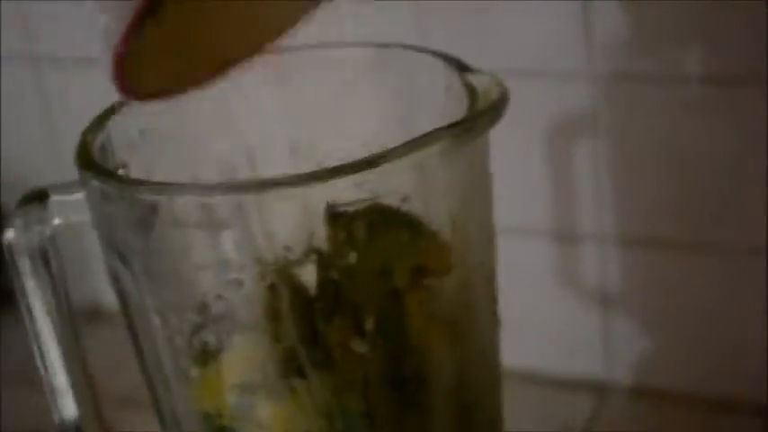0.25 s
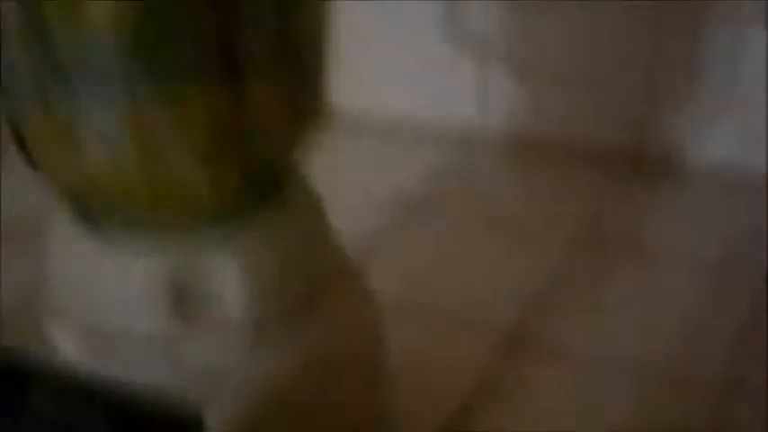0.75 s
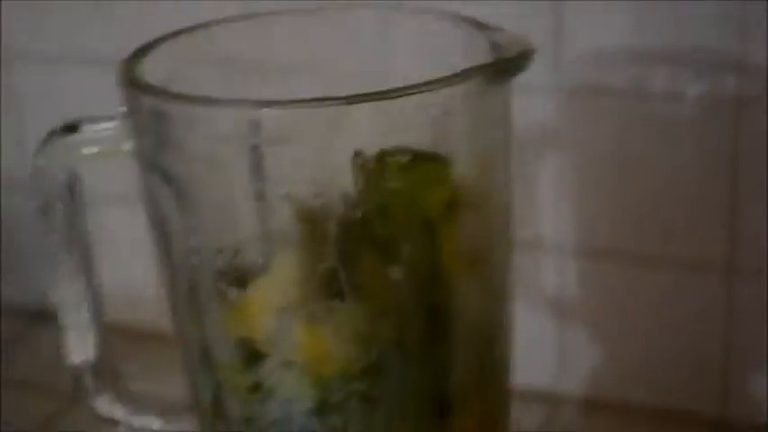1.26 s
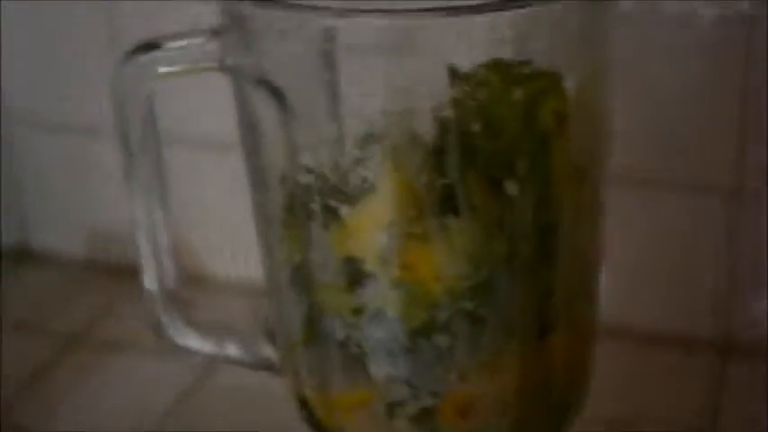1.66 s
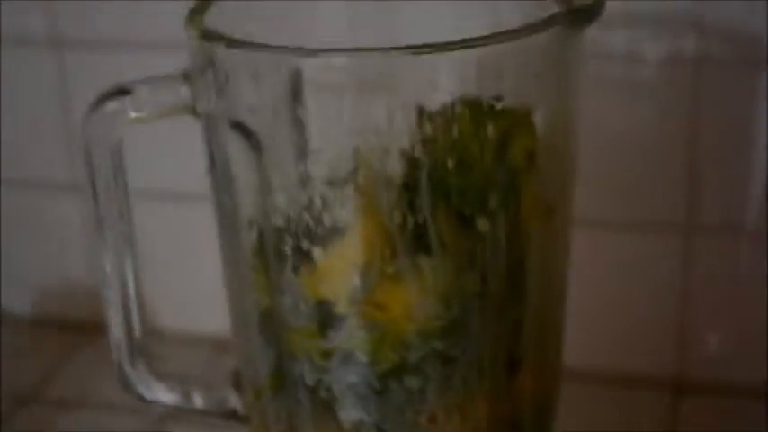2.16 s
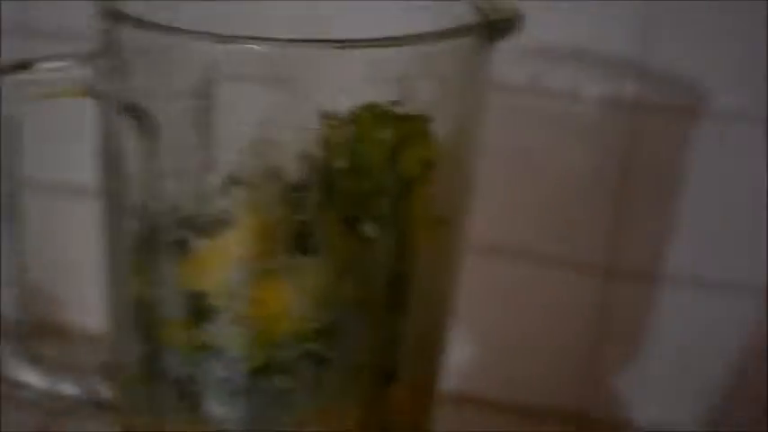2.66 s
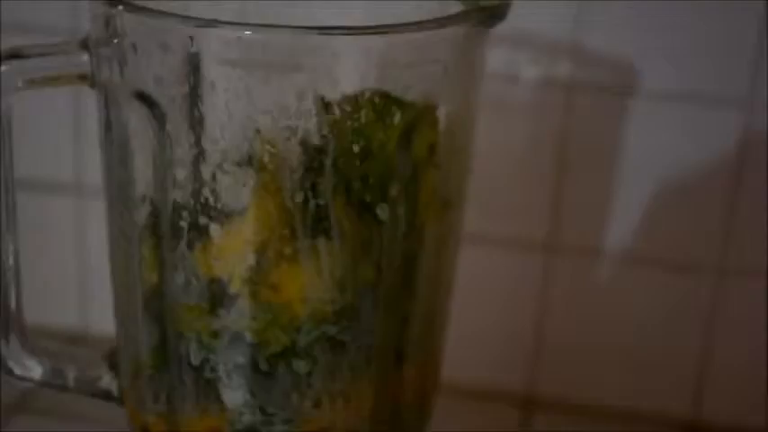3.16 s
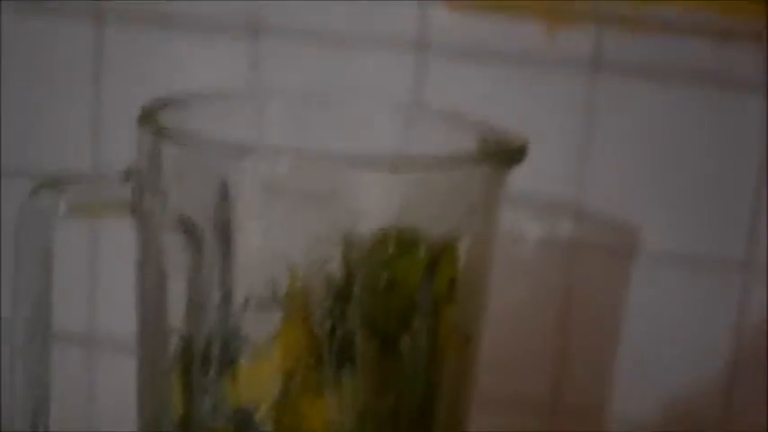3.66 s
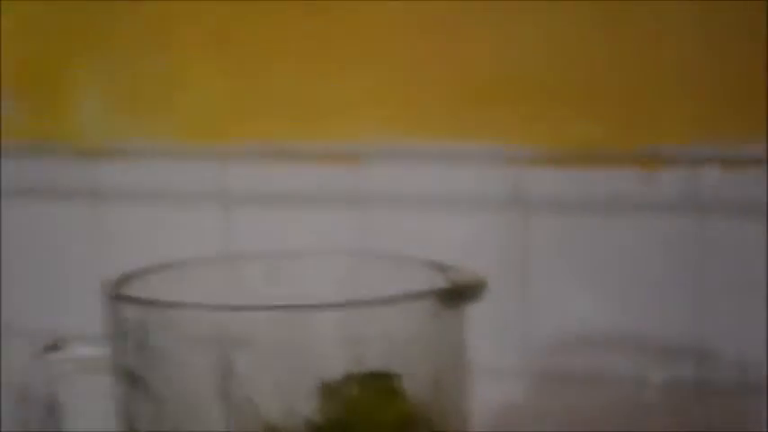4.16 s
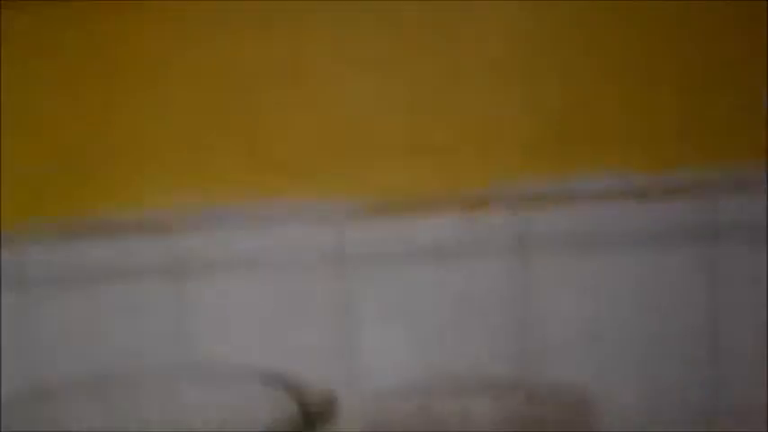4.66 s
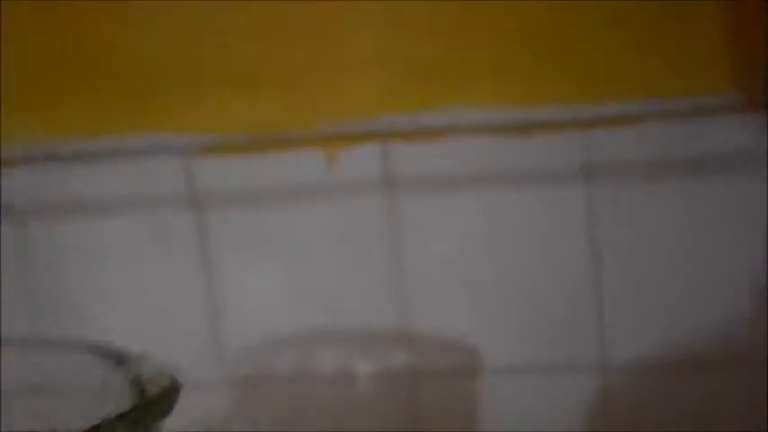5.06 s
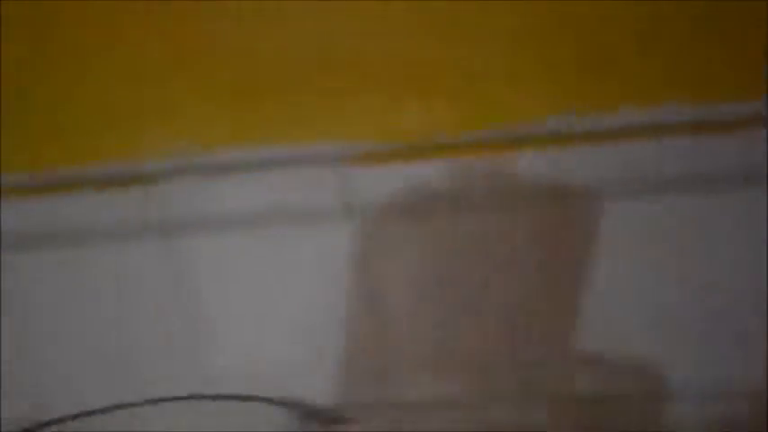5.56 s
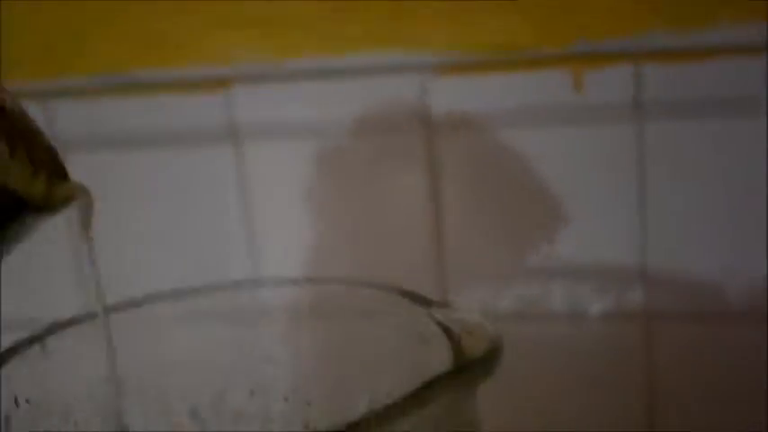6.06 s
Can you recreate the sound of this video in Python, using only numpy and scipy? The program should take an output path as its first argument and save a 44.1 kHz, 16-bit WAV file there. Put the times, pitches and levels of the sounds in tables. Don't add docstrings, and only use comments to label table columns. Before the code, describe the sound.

A close microphone in a small tiled kitchen picks up steady soft hiss and a very faint, wavering low hum throughout. During the first second there are only faint sleeve brushes, a distant crockery tone and, near 0.9, light ticks and taps with a hand rub. At 1.1 a stiff bowl knocks loudly, bouncing rapidly until 1.2, then again at 1.3; its clear midrange ring dies quickly into a short tiled echo. Quiet follows, with faint far crockery. Around 2.5 to 2.9 come rubs, crisp ticks and soft thuds. Tiny chirps outside appear near 3.2, then skin strokes and low thuds around 3.9 to 4.2. From 4.4 to 4.9 the gripped bowl bumps, briefly scrapes and rattles, duller and drier, strongest near 4.65. At 5.0 a glass rim is lightly touched several times, quickly. Soft rubbing, faint ticks, distant crockery and chirps close it by about 6.3.

```python
import sys
import numpy as np
from scipy import signal
from scipy.fft import rfft, irfft
from scipy.io import wavfile

SR = 44100
rng = np.random.default_rng(int(sys.argv[2]) if len(sys.argv) > 2 else 0)


def gain_from_db(level_db):
    decades = np.asarray(level_db, float) / 20
    return 10 ** decades


def generate_wav(sig):
    pcm = np.round(np.clip(np.atleast_2d(sig).T, -1, 1) * 32767).astype(np.int16)
    wavfile.write(sys.argv[1], SR, pcm)


N = 277830


def rms_one(x):
    return x / np.sqrt(np.mean(x ** 2) + 1e-20)


def peak_one(x):
    return x / np.abs(x).max()


def add(out, s, wave):
    i = round(s * SR)
    out[i:i + len(wave)] += wave[:N - i]


def coloured(points, size=N):
    hz, db = np.transpose(points)
    grid = np.maximum(np.arange(size // 2 + 1) * SR / size, 1)
    gain = gain_from_db(np.interp(np.log(grid), np.log(hz), db, left=-90, right=-90))
    return rms_one(irfft(rfft(rng.standard_normal(size)) * gain, size))


def drift(rate_hz):
    r = np.exp(-2 * np.pi * rate_hz / SR)
    noise = rng.standard_normal(N + SR)
    return rms_one(signal.lfilter([1], [1, -2 * r, r * r], noise)[SR:])


def ringing(modes, spread_db, tilt_db=0, detune=0.015, flipped=0, count=1):
    hz, db, t60 = np.transpose(np.repeat(modes, count, axis=0))[:, :, None]
    t = np.arange(SR // 5) / SR
    db = db + spread_db * rng.standard_normal(hz.shape) + tilt_db * np.log2(hz / 1800)
    hz = hz * (1 + detune * rng.standard_normal(hz.shape))
    sense = np.where(rng.random(hz.shape) < flipped, -1, 1)
    envelope = gain_from_db(db - 60 * t / np.maximum(t60, .003))
    return peak_one(np.sum(sense * envelope * np.sin(2 * np.pi * hz * t), axis=0))


def contact(length_ms):
    length_ms = max(length_ms, .05)
    t = np.arange(SR // 30) / SR * 1000 / length_ms
    force = rng.standard_normal(len(t)) * (t + 0.44) * np.exp(-t) * 0.135
    force[0] += 1.57 / length_ms ** 2
    return force


# f/Hz, level/dB per Hz
HISS_COLOUR = [(20, -26), (45, -18), (90, -11.5), (135, -6.5), (200, -12), (250, -6.5), (400, -3),
               (600, -4.5), (1700, -5), (4500, -10), (5600, -16), (8200, -22), (12000, -27.5), (16200, -33)]
# f/Hz, sharpness, share
HISS_HUMPS = [(4580, 28, 0.28), (7960, 18, 0.59)]


def background():
    hum_hz = 161 + 2.9 * drift(2.44)
    hum = np.sin(2 * np.pi * np.cumsum(hum_hz) / SR) * gain_from_db(-76 + 3.9 * drift(4.0))
    sway_db = .4 * drift(3)
    plain = coloured(HISS_COLOUR)
    hiss = plain
    for hz, sharpness, share in HISS_HUMPS:
        hiss = hiss + share * signal.lfilter(*signal.iirpeak(hz, sharpness, fs=SR), plain)
    return gain_from_db(-58 + sway_db) * hiss + hum


# t/s, peak level/dB, f/Hz, crack level/dB
TICKS = [(0.9194, -31, 3500, -9), (0.972, -36.5, 4400, -10), (2.4714, -45, 3970, -14),
         (2.4768, -21.5, 3880, -6), (2.6713, -41, 3870, -16), (2.6897, -33, 4060, -4.5),
         (2.744, -43, 3440, -12), (2.754, -42, 4430, -12), (2.7594, -51, 6500, -12), (2.765, -52, 5440, -8),
         (2.7794, -56, 13000, -6), (2.796, -40, 3520, -12), (2.886, -50, 4300, -17),
         (3.4344, -54, 2250, -8), (3.9236, -40, 4250, -10), (3.9544, -59, 2250, -10),
         (3.9674, -52, 3960, -7), (0.285, -56, 13800, -8), (0.82, -53, 8000, -10), (5.232, -57, 3800, -8),
         (5.482, -47, 3980, -10)]
# t/s, peak level/dB, f/Hz
TAPS = [
    (0.9181, -36.5, 2020),
    (0.9224, -34.5, 1680),
    (0.9228, -30, 3650),
    (0.972, -41, 1800),
    (2.6893, -36, 2100),
    (2.695, -38, 2820),
]
# t/s, peak level/dB, f/Hz
THUDS = [
    (2.694, -35.5, 860),
    (2.747, -39, 700),
    (2.755, -32, 685),
    (3.925, -35, 457),
    (4.164, -31.5, 670),
    (4.189, -33, 455),
    (4.209, -41, 670),
]


def ticks(rows, t60_ms):
    out, t = np.zeros(N), np.arange(SR // 50) / SR
    t60 = t60_ms / 1000
    for s, peak_db, hz, crack_db in rows:
        modes = [(hz * 0.637, -11, t60), (hz, 0, t60), (hz * 1.202, -5, t60)]
        crack = coloured([(800, -41), (3000, -18), (6000, 15.0), (10000, 2), (16000, -9)], size=len(t))
        add(out, s, gain_from_db(peak_db) * ringing(modes, 1.1, flipped=0.44))
        add(out, s, gain_from_db(peak_db + crack_db - 60 * t / 0.0071) * crack)
    return out


def small_things():
    crack_db = -27
    taps = [(*row, crack_db) for row in TAPS]
    thuds = [(*row, crack_db) for row in THUDS]
    return ticks(TICKS, t60_ms=9.1) + ticks(taps, t60_ms=9.5) + ticks(thuds, t60_ms=13)


# f/Hz, level/dB per Hz
RUB_COLOUR = [(2650, -38), (4500, -17), (5170, -4.5), (6490, 0.5), (8780, -4), (11100, -3), (12000, -2.5),
              (14500, -5.5), (16000, -13)]
# t/s at the top, level/dB, swell/s, fade/s, dull part level/dB
STROKES = [(0.766, -67, 0.16, 0.15, 1), (0.92, -61.5, 0.12, .2, -6), (1.106, -54, 0.19, 0.011, -2),
           (2.492, -50.5, 0.013, 0.0082, 7), (2.58, -54.5, 0.034, 0.097, 2),
           (2.64, -58.5, 0.09, 0.035, 8.5), (3.398, -73, 0.11, 0.093, 6), (3.61, -62, 0.047, .3, 0.5),
           (3.73, -57.5, 0.34, 0.12, -3), (3.84, -68, .1, .1, 6.5), (3.93, -62.5, 0.024, 0.17, 1),
           (4.104, -63, 0.088, 0.11, 2), (4.184, -45.5, 0.022, 0.078, -0.5), (4.39, -62.5, .03, 0.17, 6.5),
           (4.6, -54, 0.011, 0.037, -8), (4.645, -53, 0.032, 0.011, -1), (4.79, -51, .01, 0.062, -6),
           (4.856, -56, 0.032, 0.13, -1), (5.016, -56.5, 0.022, 0.21, -5), (5.47, -69, .11, .35, 5)]
# t/s at the
# top, level/dB, length/s
FAINT_STROKES = [
    (0.29, -75, .08),
    (0.388, -73, .05),
    (0.532, -69, .06),
    (0.72, -70, .05),
    (2.75, -73, 0.076),
    (4.294, -65, 0.1),
    (4.47, -45.5, .015),
    (5.233, -67, 0.046),
    (5.29, -69, .05),
]


def hands():
    grain = gain_from_db(0.5 * drift(55) + 0.35 * drift(490))
    bright = coloured(RUB_COLOUR)
    dull = coloured([(1300, -15), (3100, -12), (3900, -5.5), (5000, -9.0), (6500, -14.5)])
    t, out = np.arange(N) / SR, np.zeros(N)
    faint_strokes = [(s, db, 0.32 * length, length, -11) for s, db, length in FAINT_STROKES]
    for s, db, swell, fade, dull_db in STROKES + faint_strokes:
        near = slice(max(int((s - 2 * swell) * SR), 0), int((s + 2 * fade) * SR))
        away = np.maximum((s - t[near]) / swell, (t[near] - s) / fade)
        gain = gain_from_db(db - 20 * away)
        out[near] += gain * (bright[near] + gain_from_db(dull_db) * dull[near])
    return grain * out


# t/s, f/Hz, level/dB, length/s
FAR_TONES = [(0.607, 1320, -71, 0.089), (1.7, 1150, -69.5, 0.056), (1.72, 1700, -75, 0.069),
             (2.044, 1700, -67, 0.1), (3.238, 1250, -71, 0.1), (3.617, 2155, -63, 0.034),
             (3.712, 2720, -65, .04), (5.175, 1110, -71, 0.1), (5.472, 1310, -69, 0.11),
             (5.501, 1780, -70, 0.18), (5.506, 1930, -64.5, 0.055), (5.6, 466, -71, 0.038),
             (5.755, 1240, -68.5, 0.089), (5.773, 1920, -73, 0.092)]
# t/s, start f/Hz, end f/Hz, level/dB, length/s
CHIRPS = [
    (3.193, 11800, 11300, -82, 0.076),
    (3.383, 11700, 11200, -81, 0.067),
    (5.67, 11500, 11300, -85, .05),
    (5.85, 11800, 11200, -84, 0.13),
    (6.06, 11700, 11440, -82, .05),
]


def far_sounds():
    t, out, waver = np.arange(N) / SR, np.zeros(N), gain_from_db(6.0 * drift(41))
    far_tones = [(s, hz, hz, db, length) for s, hz, db, length in FAR_TONES]
    for s, start_hz, end_hz, db, length in far_tones + CHIRPS:
        near = np.abs(t - s) < 2 * length
        u = t[near] - s
        phase = 2 * np.pi * ((start_hz + end_hz) / 2 * u + (end_hz - start_hz) / length * u ** 2 / 2)
        out[near] += gain_from_db(db + 5.0) * np.exp(-4 * (u / length) ** 2) * np.sin(phase)
    return out * waver


# f/Hz, level/dB, t60/s
BOWL_LOW = [(520, -47, 0.01), (810, -27, 0.035), (960, -29, 0.012), (1150, -36, 0.026), (1390, -31, 0.036),
            (1436, 4.5, 0.036), (1586, 7, 0.05), (1780, 6, 0.053), (1920, 10, 0.07), (1988, 13, 0.046),
            (2150, 0.5, 0.063), (2314, 3.5, 0.081), (2640, -7, 0.068), (3150, -34, 0.013),
            (3480, -32, 0.042)]
# f/Hz, level/dB, t60/s
GRIPPED_LOW = [(610, -24, 0.019), (845, -36, 0.029), (1020, -6.5, 0.04), (1347, -2.5, 0.026),
               (1555, -0.5, 0.023), (1600, -8, 0.024), (1780, 8, 0.025), (1920, 3, 0.019),
               (2020, -2, 0.037), (2260, -6.5, 0.029), (2567, -7.5, 0.017), (2860, -11.5, 0.012),
               (3420, -10.5, 0.013), (3590, -16, 0.0088)]
# f/Hz, level/dB, t60/s
BOWL_HIGH = [(4200, -15, 0.0019), (5200, -12.5, 0.0087), (5700, -0.5, 0.059), (5800, 4, 0.017),
             (6770, -11, 0.0052), (6940, -2, 0.015), (7490, 4, 0.062), (7510, 5, 0.029), (7830, -2, 0.011),
             (9440, -16.5, 0.0074), (10300, -1.5, 0.019), (10300, -2, 0.0024), (13100, -8.5, 0.027),
             (13300, -22, 0.0072), (14560, -18.5, .016)]
# f/Hz, level/dB per Hz
CLATTER = [(2200, -34), (3600, -14), (5000, -3.5), (9000, 5.5), (13000, -6), (16000, 3)]
# t/s, peak level/dB, low ring tilt/dB per octave, high ring level/dB
KNOCKS = [
    (1.1083, 2, -16, -25),
    (1.1522, -1, 14, -17),
    (1.174, -7.5, 12, -10.5),
    (1.1882, -4.5, 19, -34),
    (1.1963, -11.5, -14, -37),
    (1.307, -3, 9, -10),
    (1.3154, -4, 9, -13.5),
    (1.3204, -4.5, 10, -32),
]
# t/s, peak level/dB
REBOUNDS = [
    (1.2065, -44),
    (1.217, -47),
    (1.274, -56),
    (1.3024, -36),
]
# t/s, peak level/dB, low ring tilt/dB per octave, high ring level/dB
BUMPS = [(4.3826, -37, 18, -27), (4.4705, -21, -17, -32), (4.5476, -11, 0, -24), (4.5565, -12.5, -4, -16.5),
         (4.5636, -9.5, -2.5, -25), (4.6501, -8.5, 22, -16.5), (4.6532, -3.5, 5, -42),
         (4.6581, -12.5, 0, -16), (4.6641, -12, 7, -39), (4.7131, -13, 2, -13.5),
         (4.7739, -19.5, -13.5, -23), (4.7824, -20, -12, -30), (4.807, -22.5, -8, -33),
         (4.8309, -30, -5, -32), (4.8483, -33, -30, -30)]
# t/s, peak level/dB
HELD_REBOUNDS = [
    (4.4755, -42),
    (4.5763, -38),
    (4.5861, -32),
    (4.636, -30),
    (4.6754, -25),
    (4.682, -27.5),
    (4.699, -37),
    (4.723, -34),
    (4.7435, -29),
    (4.9114, -39),
]


def bowl(blows, rebounds, rebound_high_db, length_ms, low_modes, flipped, clatter_db):
    out = np.zeros(N)
    soft = signal.butter(4, 3100, fs=SR, output="sos")
    fade = gain_from_db(-60 * np.arange(SR // 10) / SR / 0.042)
    light_blows = [(s, db, 6, rebound_high_db) for s, db in rebounds]
    for s, peak_db, tilt_db, high_db in blows + light_blows:
        force = contact(length_ms)
        wall = ringing(low_modes, 3.0, tilt_db, detune=.02, flipped=flipped, count=2)
        low = peak_one(signal.fftconvolve(wall, signal.sosfilt(soft, force)))
        rim = ringing(BOWL_HIGH, 2.0, detune=.013, flipped=.3, count=4)
        high = peak_one(signal.fftconvolve(rim, force))
        puff = fade * coloured(CLATTER, size=len(fade))
        arrival = s + .0006
        add(out, arrival, gain_from_db(peak_db - 3.0) * (low + gain_from_db(high_db + 7) * high))
        add(out, arrival, gain_from_db(peak_db + high_db + clatter_db) * puff)
    return out


def knocked_bowl():
    return bowl(KNOCKS, REBOUNDS, rebound_high_db=0, length_ms=0.15, low_modes=BOWL_LOW,
                flipped=0, clatter_db=-16.5)


def held_bowl():
    return bowl(BUMPS, HELD_REBOUNDS, rebound_high_db=-20, length_ms=1.9, low_modes=GRIPPED_LOW,
                flipped=.3, clatter_db=-12.0)


# t/s, wall pressure level/dB, rim slip level/dB
DRAG = [
    (4.472, -37, -52),
    (4.536, -36, -27),
    (4.548, -22, -40),
    (4.564, -19, -27.5),
    (4.6, -60, -57),
]


def drag_gain(column):
    rows = np.array(DRAG)
    gain = gain_from_db(np.interp(np.arange(N) / SR, rows[:, 0], rows[:, column], left=-150, right=-150))
    return signal.lfilter([.008], [1, -.992], gain)


def drag():
    strength = rng.standard_normal(N) * gain_from_db(1.2 * rng.exponential(1, N))
    slips = strength * (rng.random(N) < 5000 / SR)
    wall = ringing(GRIPPED_LOW, 2.2, flipped=.3)
    rim = ringing(BOWL_HIGH, 2.1, detune=0.015, flipped=.3, count=4)
    low = rms_one(signal.fftconvolve(slips, wall)[:N])
    high = rms_one(signal.fftconvolve(slips, rim)[:N]) + gain_from_db(-6) * coloured(CLATTER)
    return gain_from_db(-8.5) * (low * drag_gain(column=1) + high * drag_gain(column=2))


# t/s, peak level/dB
CLINKS = [
    (5.008, -31),
    (5.015, -29.5),
    (5.027, -28.5),
    (5.04, -27),
    (5.059, -40),
]
# f/Hz, level/dB, t60/s
GLASS = [(890, -4, 0.08), (1887, 2, 0.095), (2030, -1, 0.014), (3030, -12, 0.088), (5140, -17, 0.13),
         (6500, -19, .02), (6880, -7, 0.028)]


def glass():
    out = np.zeros(N)
    for s, peak_db in CLINKS:
        ring = signal.fftconvolve(ringing(GLASS, 3.5, detune=0.0016), contact(length_ms=2.6))
        add(out, s, gain_from_db(peak_db - 5.0) * peak_one(ring))
    return out


# band edge f/Hz, t60/s
ROOM = [(150, 0.26), (1000, 0.27), (3000, 0.24), (6000, 0.24), (11000, 0.2), (16000, .15)]


def kitchen(x):
    t, tail = np.arange(SR // 2) / SR, 0
    for (low_hz, t60), (high_hz, _) in zip(ROOM, ROOM[1:]):
        band = signal.butter(2, [low_hz, high_hz], "band", fs=SR, output="sos")
        tail = tail + signal.sosfilt(band, rng.standard_normal(len(t))) * gain_from_db(-60 * t / t60)
    tail = tail * np.clip((t - .003) / 0.0012, 0, 1)
    return signal.fftconvolve(x, tail / np.sqrt(np.sum(tail ** 2)))[:N]


def scene():
    heavy = knocked_bowl() + held_bowl() + drag() + glass()
    light = small_things()
    wet = kitchen(gain_from_db(-7) * heavy + gain_from_db(-11.5) * light)
    near = signal.sosfilt(signal.butter(2, [420], "high", fs=SR, output="sos"), heavy + light + wet)
    near = signal.sosfilt(signal.butter(1, [900], "high", fs=SR, output="sos"), near)
    return (near + hands() + far_sounds() + background())[None]


def roll_off(x):
    return signal.sosfilt(signal.butter(12, 15740, fs=SR, output="sos"), x)


def record(dry):
    dip = dry - 0.61 * signal.lfilter(*signal.iirpeak(11850, 11.0, fs=SR), dry)
    cut = signal.sosfilt(signal.cheby2(14, 50, 16480, fs=SR, output="sos"), dip)
    return roll_off(cut)


dry = scene()
out = record(dry)
generate_wav(out)
```